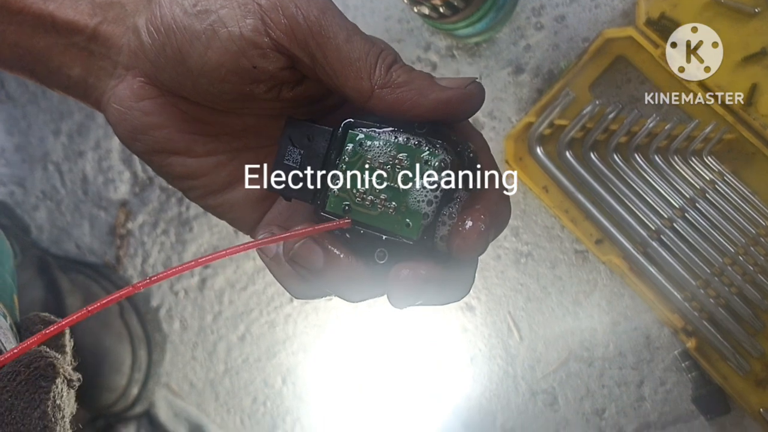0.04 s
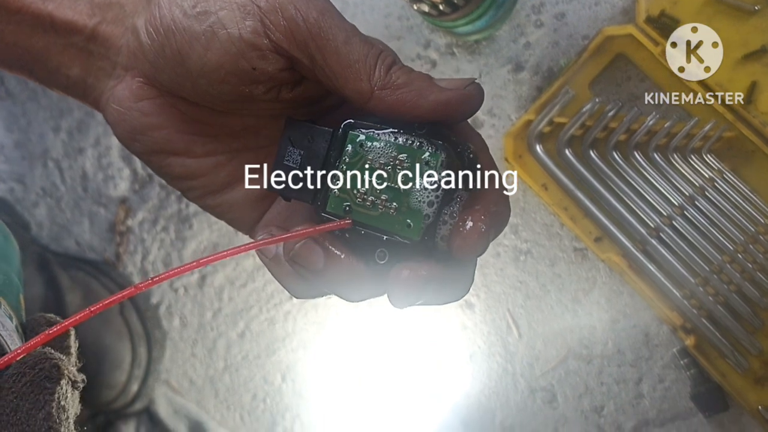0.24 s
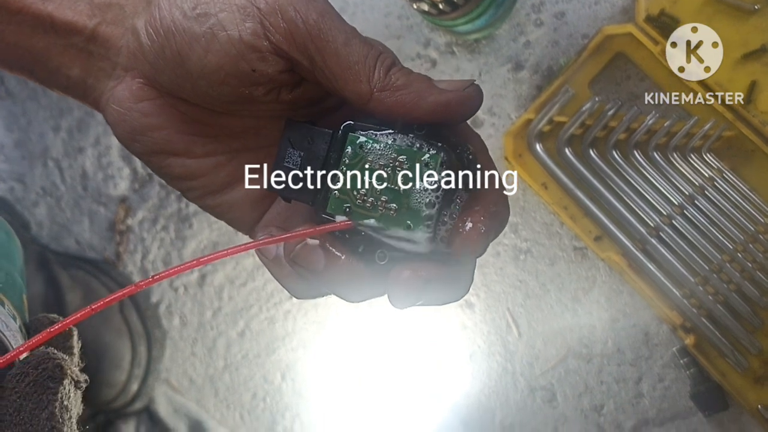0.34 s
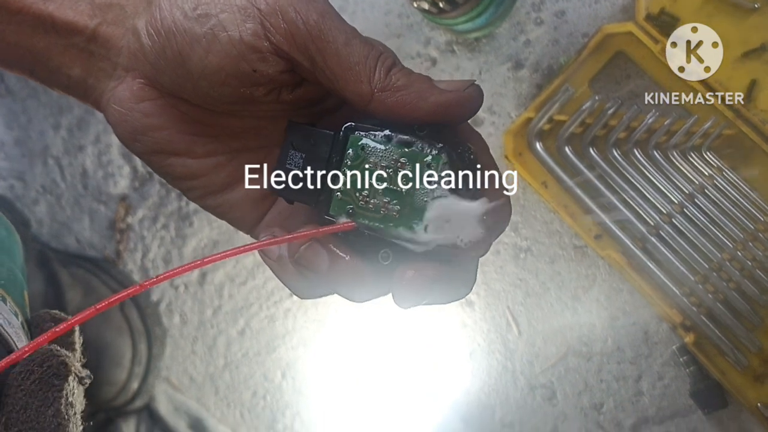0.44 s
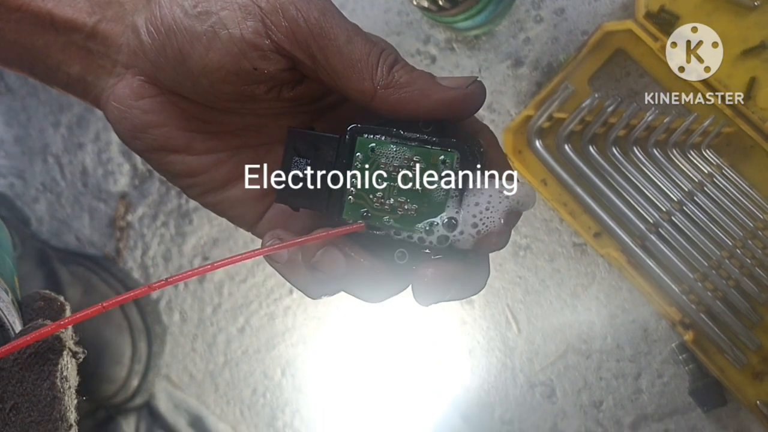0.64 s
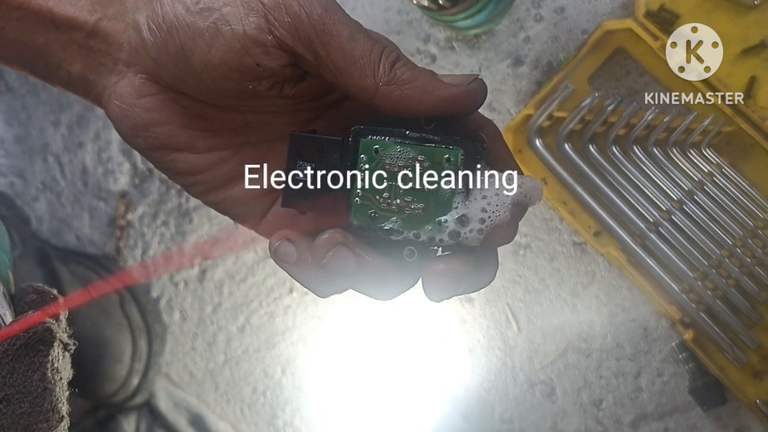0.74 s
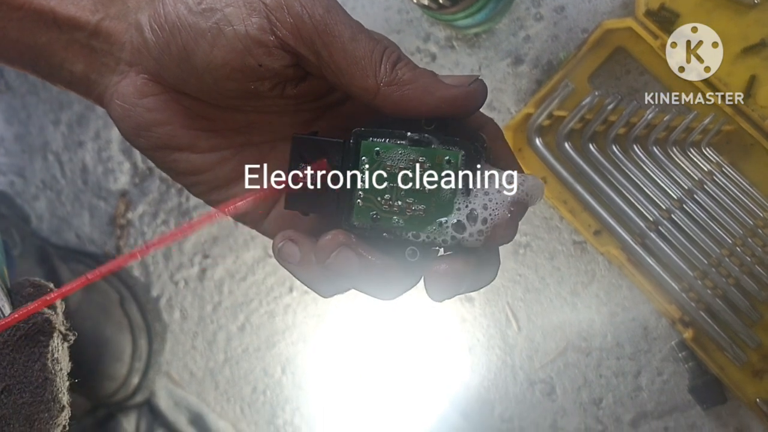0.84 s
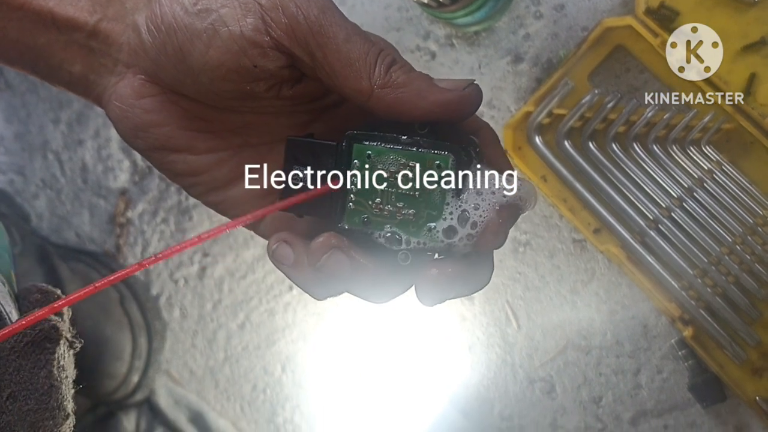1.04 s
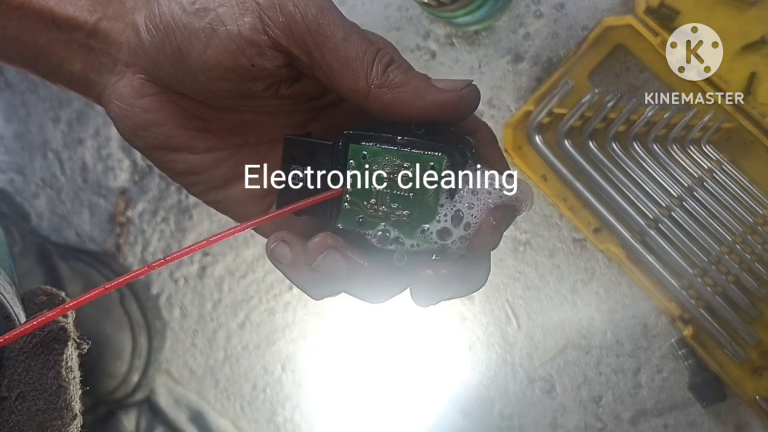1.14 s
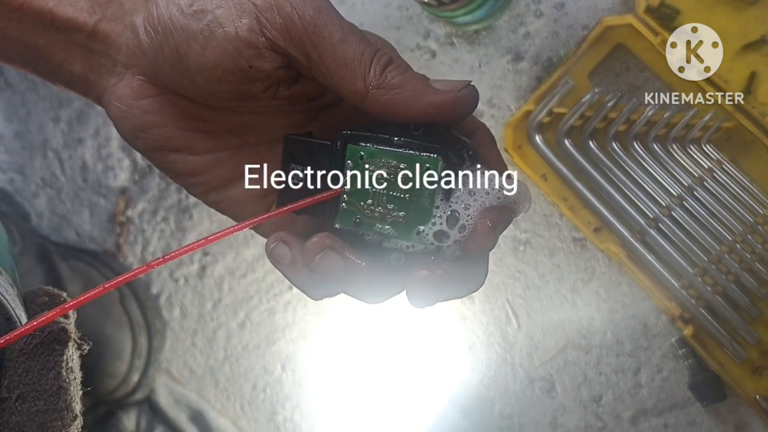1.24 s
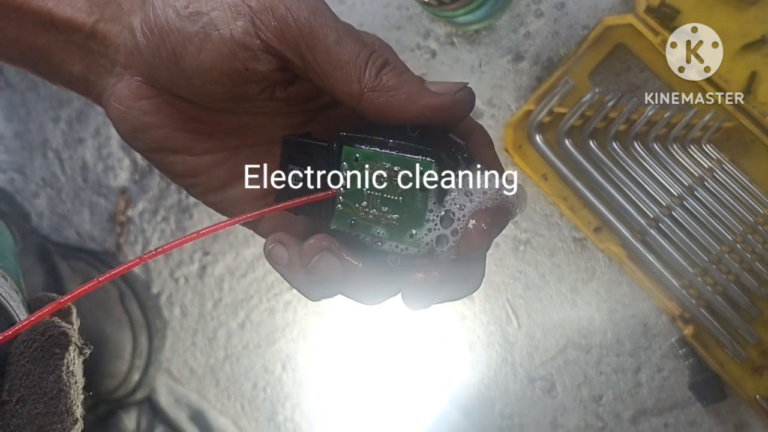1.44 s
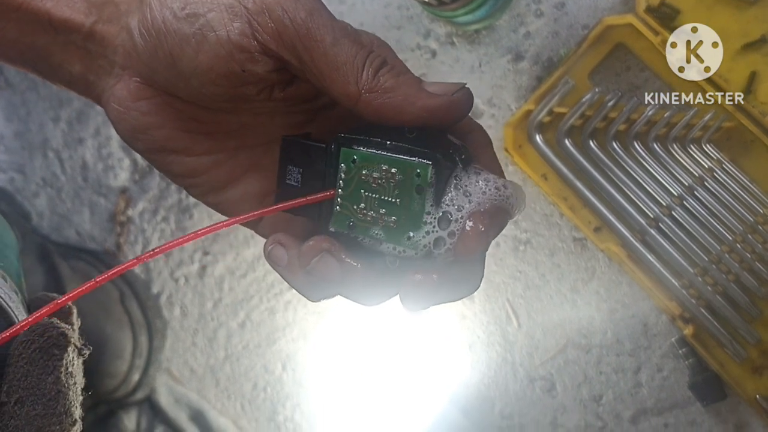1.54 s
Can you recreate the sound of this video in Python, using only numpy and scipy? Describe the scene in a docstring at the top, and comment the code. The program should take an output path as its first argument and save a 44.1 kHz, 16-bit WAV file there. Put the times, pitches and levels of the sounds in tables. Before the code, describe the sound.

A single aerosol burst is the main sound, close and on the left. Soft, low handling bumps come first, from about 0.2 seconds. At 0.4 seconds the spray spits, then hisses brightly through a thin straw, droplets spattering on a circuit board, and stops at 0.6 with a brief room tail. A distant machine hums faintly throughout, and a faint, thin whine rises from about 1.2 to 1.6 seconds.

```python
"""Soft handling bumps, then one short burst of aerosol cleaner onto a small circuit board, near a phone.
The valve spits, the gas jet hisses and rings its thin straw, and droplets spatter on the board,
leaving a brief room tail. A machine hums far off and a faint whine rises at the end.
The scene sits in the left channel; the right carries only microphone hiss."""
import sys
import numpy as np
from scipy import signal
from scipy.fft import rfft, irfft
from scipy.io import wavfile

SR = 44100
rng = np.random.default_rng(int(sys.argv[2]) if len(sys.argv) > 2 else 0)


def to_wav(sig):
    """Store sig (one row per channel, or 1-D mono) as 16-bit WAV at the path in sys.argv[1].

    Samples outside -1..1 are clipped; the rate is SR.
    """
    pcm = np.clip(np.atleast_2d(sig), -1, 1) * 32767
    pcm = np.round(pcm).astype(np.int16)
    wavfile.write(sys.argv[1], SR, pcm.T)  # frames by channels


N = 70560
T = np.arange(N) / SR
FREQS = np.maximum(np.fft.rfftfreq(N, 1 / SR), 1)


# Bright hiss of the gas: freq_hz, gain_db
JET_EQ = [(1500, -62), (2600, -27.5), (3300, -9.5), (4400, -16), (6000, -15.5), (8000, -18.5), (9400, -16),
          (10300, -7.5), (11000, -9), (12000, -0.5), (13000, 0), (14200, 0), (15400, -2)]
# Narrow peaks and one notch of the straw: freq_hz, width_hz, gain_db
STRAW_RESONANCES = [(4000, 26, 7.5), (10310, 61, 5.5), (11500, 44, 5), (11900, 35, 5), (12040, 32, -5.5),
                    (12000, 55, -15), (12970, 29, 13), (13500, 35, 7), (14730, 40, 7), (15100, 35, 3)]
# Swell of the gas flow: time_s, gain_db
FLOW_ENVELOPE = [(.409, -2.5), (.422, -2.5), (.437, -3), (.452, 2), (.468, 4), (.495, 0.5), (.53, 0.5),
                 (.555, 0.5), (.585, -3.5)]
def jet(level_db=-16.5, flutter_db=1.35, flutter_hz=800):
    """Turbulent gas rushes out of the straw and rings its narrow resonances."""
    straw = 1
    for freq_hz, width_hz, gain_db in STRAW_RESONANCES:
        straw = straw + (undb(gain_db) - 1) / (1 + 2j * (FREQS - freq_hz) / width_hz)
    gas = colour(noise(), JET_EQ)
    ringing_gas = unit(irfft(rfft(gas) * straw, N))
    return ringing_gas * undb(level_db + curve(FLOW_ENVELOPE) + flutter_db * walk(flutter_hz))


# Tone of liquid hitting the board: freq_hz, gain_db
SPATTER_EQ = [(150, -20), (400, 1), (800, -4.5), (1200, -0.5), (2200, 1.5), (3500, -0.5), (4500, -5),
              (6300, 1), (9000, -2.5), (15000, -13)]
# Swell of the spatter: time_s, level_db
SPATTER_ENVELOPE = [(.41, -43.5), (.435, -39.5), (.455, -33.5), (.474, -29.5), (.497, -32), (.53, -33),
                    (.555, -33.5), (.585, -42)]
def spatter(drops_per_s=20000, spread_db=2):
    """Thousands of tiny droplets strike the board, each a click of random strength."""
    hits = rng.random(N) < drops_per_s / SR
    drops = hits * noise() * undb(spread_db * noise())
    return unit(colour(drops, SPATTER_EQ)) * undb(curve(SPATTER_ENVELOPE))


# Sputter at the front of the burst: start_s, level_db
SPIT_HITS = [(.4050, -25), (0.42, -17), (0.43, -22)]
def spits(decay_s=0.0023):
    """Sharp puffs of hiss stutter out as the valve opens."""
    envelope = 0
    for start_s, level_db in SPIT_HITS:
        envelope += undb(level_db) * (T >= start_s) * np.exp(-np.abs(T - start_s) / decay_s)
    return envelope * unit(colour(noise(), JET_EQ))


def spray(open_s=0.4045, attack_s=0.013, close_s=0.579, release_s=0.017):
    """The valve gates jet and spatter together, with the spits on top of the attack."""
    opening = np.clip((T - open_s) / attack_s, 0, 1)
    closing = np.clip(1 - (T - close_s) / release_s, 0, 1)
    return spits() + opening * closing * (jet() + spatter())


# Darker tone of the reverb: freq_hz, gain_db
ROOM_EQ = [(500, 7.5), (6000, 1.5), (12000, 0), (15500, -9)]
def room(direct, send_db=-18, t60_s=0.34):
    """The room answers with a short tail, a little duller than the direct sound."""
    tail = noise() * np.exp(-np.log(1000) * T / t60_s)
    tail /= np.linalg.norm(tail)
    return undb(send_db) * signal.fftconvolve(colour(direct, ROOM_EQ), tail)[:N]


# Soft low knocks of the hand: peak_s, level_db, pitch_hz, half_length_ms
HANDLING_BUMPS = [(0.2145, -19, 108, 9.3), (.2440, -21.5, 126, 6), (.2550, -28.5, 192, 4.4),
                  (0.2741, -19.5, 169, 5.4), (.2850, -27, 226, 3.6), (.2900, -21, 130, 4.6),
                  (.2975, -25.5, 92, 18), (0.3166, -11, 128, 1.9), (0.3569, -14.5, 124, 2.44),
                  (.3640, -16.5, 125, 3.9), (0.3726, -10, 284, 1.36), (0.3798, -19, 94, 8.7),
                  (0.3896, -11.5, 136, 3.3), (.3958, -20, 270, 1.34), (.4090, -20.5, 141, 6.7),
                  (0.4382, -30, 119, 4.4), (.4650, -26, 125, 6.8), (.5900, -30.5, 83, 8.6),
                  (0.64, -31.5, 116, 9.9), (.8170, -41, 99, 9.5)]
# Bassy tone of the grip: freq_hz, gain_db
RUB_EQ = [(25, -13), (55, -1), (85, 5.5), (120, 0), (200, -12.5), (350, -13.5), (700, -46), (2000, -68)]
# Rise and fall of the rub: time_s, level_db
RUB_ENVELOPE = [(0, -46), (.04, -43.5), (.14, -59), (.2, -35), (.36, -36.5), (.42, -37), (.52, -44),
                (.63, -44.5), (.7, -56.5), (.81, -55), (.95, -58), (1.6, -65)]
def handling():
    """Soft bumps of a cycle or two swell and fade over the rub of the grip."""
    bumps = 0
    for peak_s, level_db, pitch_hz, half_length_ms in HANDLING_BUMPS:
        swell = np.exp(-((T - peak_s) / (half_length_ms / 1000)) ** 2)
        bumps += undb(level_db) * swell * np.cos(2 * np.pi * pitch_hz * (T - peak_s))
    rub = unit(colour(noise(), RUB_EQ)) * undb(curve(RUB_ENVELOPE))
    return bumps + rub


# Partials of the machine drone: pitch_hz, level_db
HUM_TONES = [(98, -56), (260, -55.5), (351, -57), (523, -62), (775, -61.5), (910, -82), (1044, -68.5),
             (1125, -64.5)]
def machine_hum(waver_depth=0.00872, waver_hz=8.9, flicker_db=0.5, flicker_hz=9.8):
    """A distant machine drones, each tone wavering in pitch and level on its own."""
    hum = 0
    for pitch_hz, level_db in HUM_TONES:
        phase = 2 * np.pi * np.cumsum(pitch_hz * (1 + waver_depth * walk(waver_hz))) / SR
        hum += np.sqrt(2) * np.sin(phase) * undb(level_db + flicker_db * walk(flicker_hz))
    return hum


# Upward glide of the whine: time_s, pitch_hz, level_db
WHINE_GLIDE = [(1.15, 2850, -63.5), (1.26, 2924, -64), (1.35, 3050, -57.5), (1.48, 3330, -56.5),
               (1.6, 3390, -58)]
def whine(width_hz=170):
    """A narrow band of noise sounds as a thin, rough tone that climbs and levels off."""
    phase = 2 * np.pi * np.cumsum(curve(WHINE_GLIDE)) / SR
    band = walk(width_hz / 2) * np.cos(phase) + walk(width_hz / 2) * np.sin(phase)
    return band * undb(curve(WHINE_GLIDE, column=2))


# Room tone: freq_hz, density_db_per_hz
ROOM_TONE = [(25, -100), (60, -75), (110, -77.5), (220, -78.5), (400, -79.5), (600, -81.5), (1100, -81),
             (1600, -87.5), (2400, -88.5), (3300, -105.5), (4000, -106), (6800, -112), (7450, -94),
             (8100, -114), (11000, -112), (12300, -101), (14000, -108), (15000, -95), (15600, -103)]
# Microphone hiss: freq_hz, density_db_per_hz
MIC_HISS = [(25, -112), (50, -102), (90, -79), (150, -86), (350, -85.5), (600, -90.5), (3300, -92),
            (3800, -98), (6700, -101), (7300, -105), (9000, -106), (11200, -104), (11900, -100.5),
            (15500, -101)]
def noise_bed(spectrum):
    """A steady bed of noise with the given density."""
    return colour(noise(), spectrum) * np.sqrt(SR / 2)


def undb(db):
    """Decibels to gain."""
    return 10 ** (np.asarray(db) / 20)


def unit(x):
    """Scale to rms 1."""
    return x / np.std(x)


def curve(rows, column=1):
    """One column of a table, joined by straight lines in time."""
    rows = np.array(rows)
    return np.interp(T, rows[:, 0], rows[:, column])


def colour(x, eq):
    """Filter by an EQ curve of freq_hz, gain_db points."""
    freq_hz, gain_db = np.array(eq).T
    gain = undb(np.interp(np.log(FREQS), np.log(freq_hz), gain_db))
    return irfft(rfft(x) * gain, N)


def noise():
    """White noise."""
    return rng.standard_normal(N)


def walk(rate_hz):
    """Smooth random modulation of rms 1, rolling off above the given rate."""
    rolloff = np.exp(-(FREQS / rate_hz) ** 2 / 2)
    return unit(irfft(rfft(noise()) * rolloff, N))


def scene():
    """Everything reaches the left microphone; each channel has its own hiss."""
    burst = spray()
    left = burst + room(burst) + handling() + machine_hum() + whine() + noise_bed(ROOM_TONE)
    return np.array([left + noise_bed(MIC_HISS), noise_bed(MIC_HISS)])


def record(dry, low_cut_hz=55, high_cut_hz=15500):
    """The phone thins the deep bass and cuts the top."""
    low_cut = signal.butter(2, low_cut_hz, "high", fs=SR, output="sos")
    high_cut = signal.ellip(12, .1, 80, high_cut_hz, fs=SR, output="sos")
    thinned = signal.sosfiltfilt(low_cut, dry, padtype="even")
    return signal.sosfilt(high_cut, thinned)


dry = scene()
out = record(dry)
to_wav(out)
```